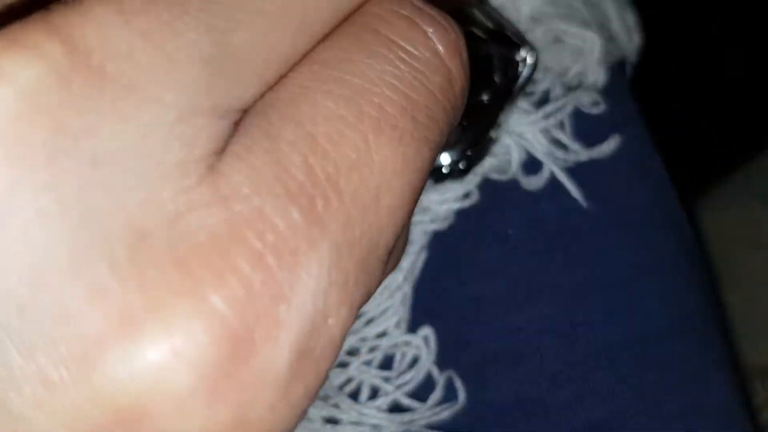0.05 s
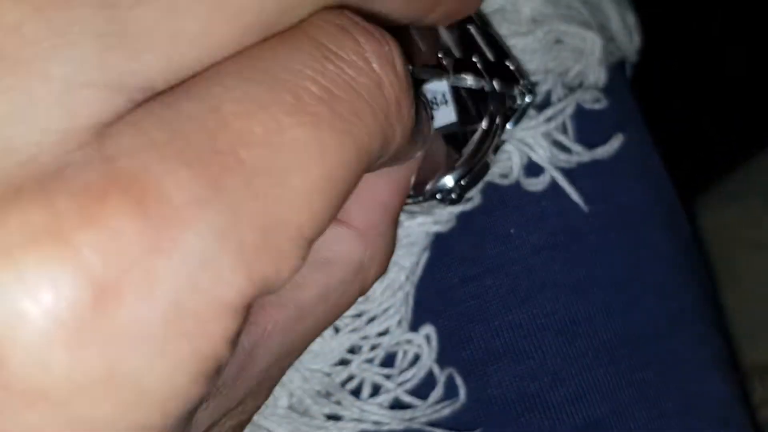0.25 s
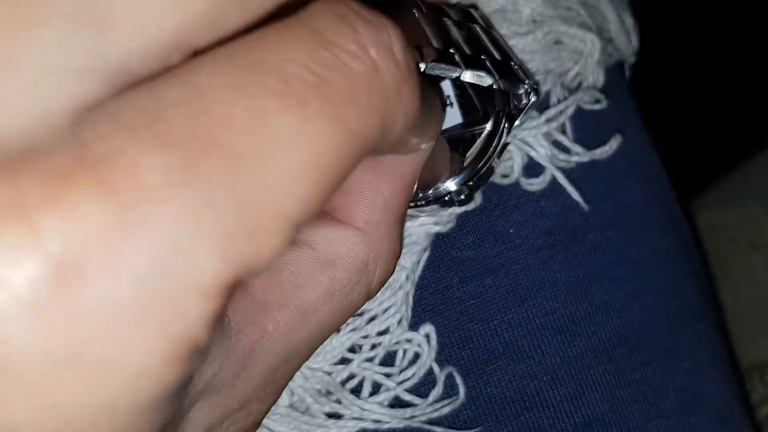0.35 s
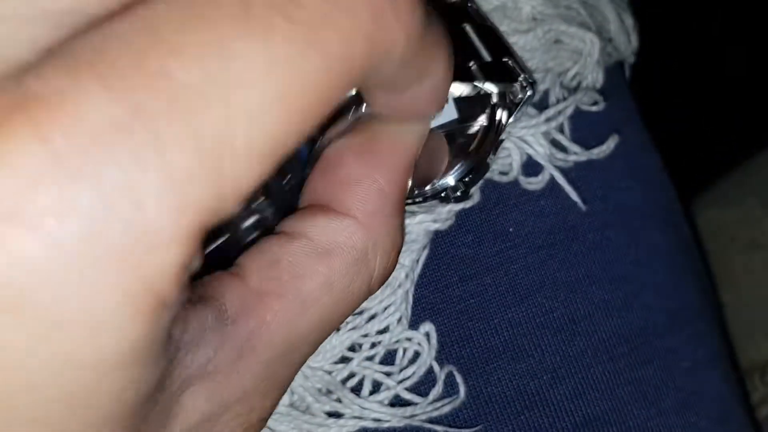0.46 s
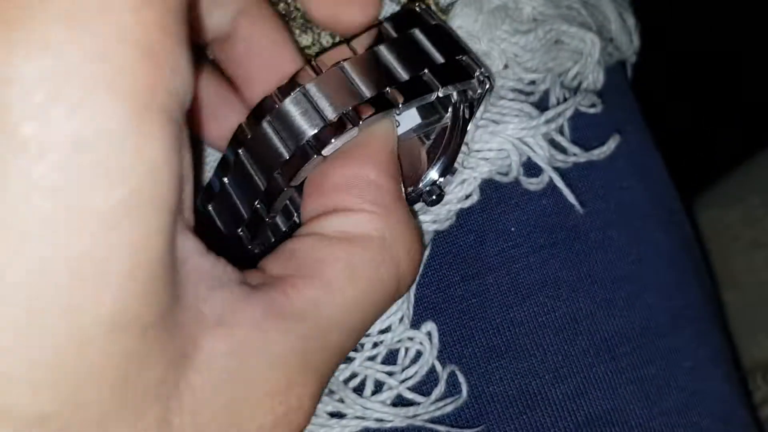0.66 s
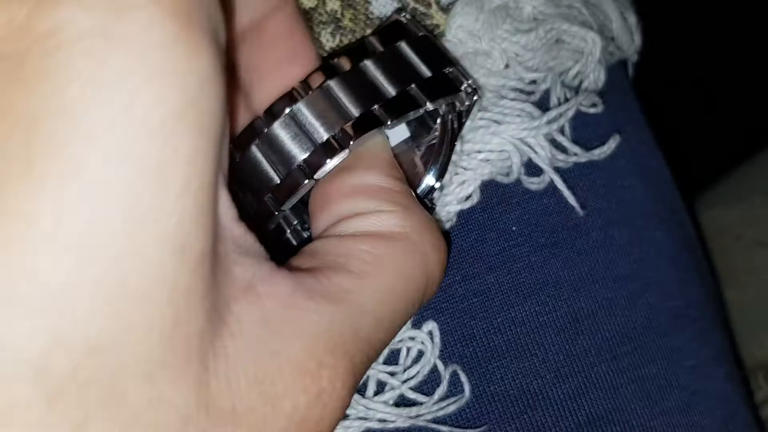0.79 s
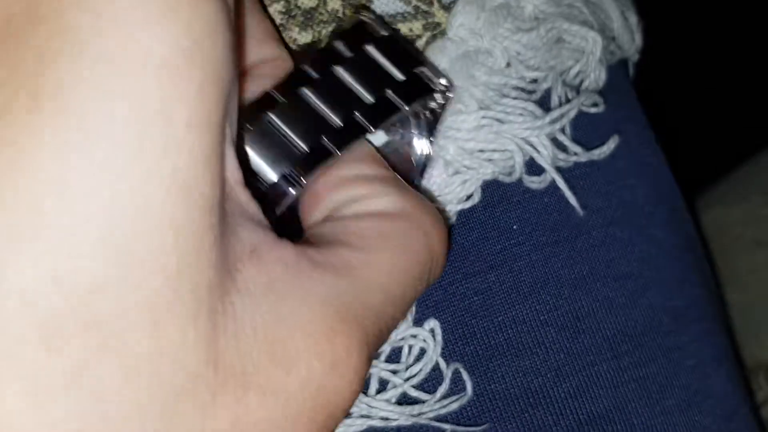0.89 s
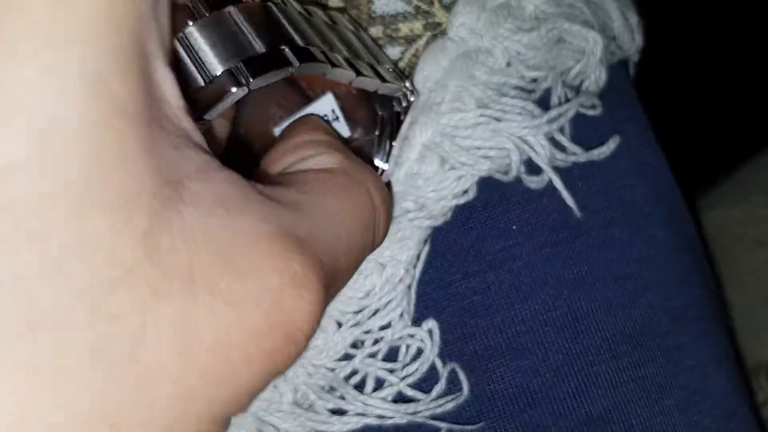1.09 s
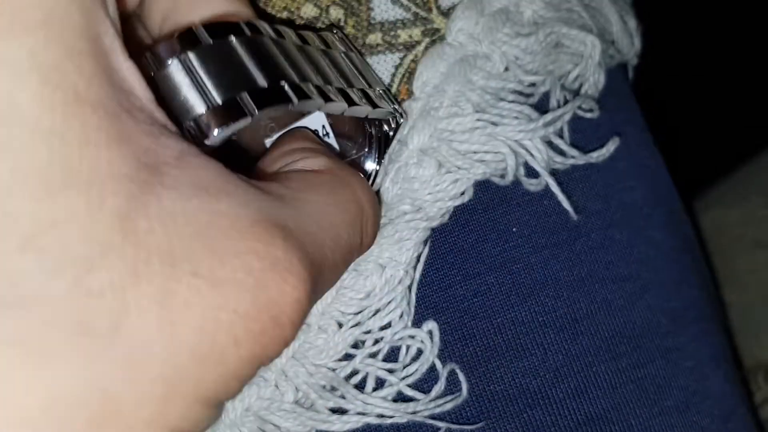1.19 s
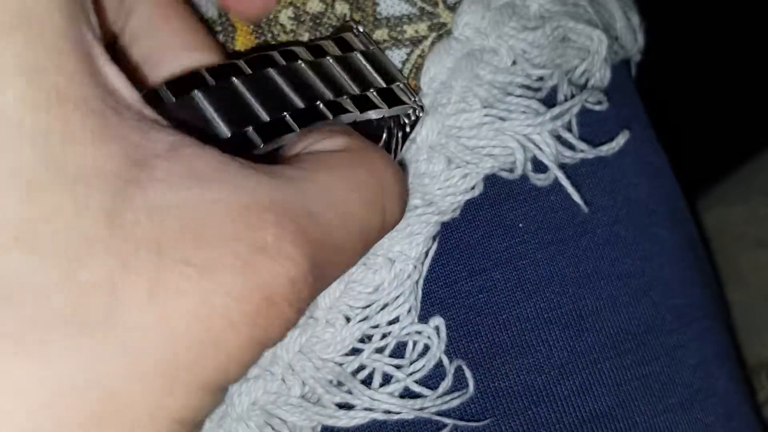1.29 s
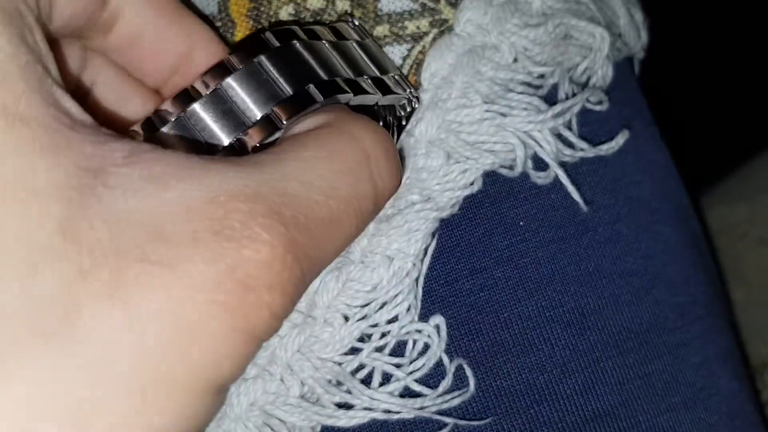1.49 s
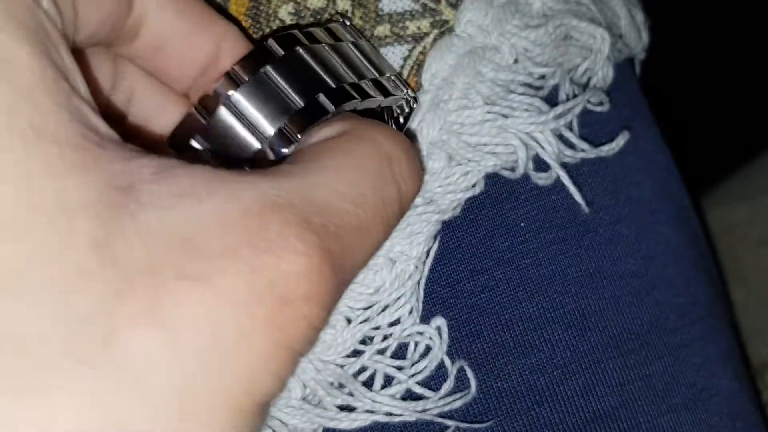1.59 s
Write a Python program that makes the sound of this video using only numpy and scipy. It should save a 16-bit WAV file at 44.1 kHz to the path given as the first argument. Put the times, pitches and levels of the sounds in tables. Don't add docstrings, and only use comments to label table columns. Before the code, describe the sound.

Steel watch links clink loudly once, then rattle lightly in scattered flurries with tiny ticks, thin pin squeaks and skin brushing metal; close and dry, over faint low room rumble and slight hiss.

```python
import sys
import numpy as np
from scipy import signal
from scipy.fft import rfft, irfft
from scipy.io import wavfile
from scipy.ndimage import uniform_filter1d

SR = 44100
rng = np.random.default_rng(int(sys.argv[2]) if len(sys.argv) > 2 else 0)


def pcm_store(signal):
    levels = np.round(np.clip(np.atleast_2d(signal), -1, 1) * 32767)
    wavfile.write(sys.argv[1], SR, levels.astype(np.int16).T)


def magnitude_from_level(level_db):
    exponent = np.asarray(level_db, float) / 20
    return 10 ** exponent


N = 72765
TIME = np.arange(N) / SR
BIN_HZ = np.maximum(np.arange(N // 2 + 1) * SR / N, 1)


def rms_one(x):
    return x / np.sqrt(np.mean(x ** 2) + 1e-20)


def at_hz(points, hz):
    table_hz, value = np.transpose(points)
    return np.interp(np.log(hz), np.log(table_hz), value)


def drift(rate_hz):
    r = np.exp(-2 * np.pi * rate_hz / SR)
    slow = signal.lfilter([1], [1, -2 * r, r * r], rng.standard_normal(N + SR))
    return rms_one(slow[SR:])


def ring(x, hz, t60):
    r, w = magnitude_from_level(-60 / (t60 * SR)), 2 * np.pi * hz / SR
    return signal.lfilter([0, np.sin(w)], [1, -2 * r * np.cos(w), r * r], x + 1e-18)


def colour(x, spectrum):
    return rms_one(irfft(rfft(x) * magnitude_from_level(at_hz(spectrum, BIN_HZ)), N))


def noise(spectrum):
    return colour(rng.standard_normal((2, N)), spectrum)


def gate(start, length):
    t = TIME - start
    return np.clip(np.minimum(t / .002, (length - t) / (.3 * length)), 0, 1), t


def top_cut(x):
    return signal.sosfilt(signal.cheby2(14, 45, 16150, fs=SR, output="sos"), x)


# frequency in Hz, level in dB.
ROOM_SPECTRUM = [(20, -39), (35, -11), (52, 5.5), (75, 3), (110, -9), (400, -20), (700, -27), (3000, -35)]
# frequency in Hz, left-right likeness from 0 to 1.
ROOM_LIKENESS = [(30, 0.89), (80, 0.77), (200, 0.23), (1000, 0.026), (8000, 0.047)]


def room_rumble():
    mid, side = rfft(rng.standard_normal((2, N)))
    alike = np.clip(at_hz(ROOM_LIKENESS, BIN_HZ), 0, 1)
    pair = irfft(np.sqrt(1 + alike) * mid + np.sqrt(1 - alike) * side * [[1], [-1]], N)
    return magnitude_from_level(-68 + 0.28 * drift(2.7)) * colour(pair, ROOM_SPECTRUM)


# frequency in Hz, level in dB per Hz.
HISS_SPECTRUM = [(2000, 2.5), (3500, -6), (6000, -16.5), (8300, -25), (14500, 4), (16500, -2.5)]


def microphone_hiss():
    return magnitude_from_level(-77) * noise(HISS_SPECTRUM)


# time in seconds, level in dB.
RUB_LEVEL = [(0, -100), (.19, -94), (.3, -77), (.39, -71), (.45, -72), (.62, -69), (.7, -79.5), (.86, -70),
             (1.22, -73.5), (1.4, -76.5), (1.45, -83), (1.6, -87)]
# frequency in Hz, level in dB per Hz.
RUB_SPECTRUM = [(1000, -19.5), (2300, -12), (3500, -12), (6800, -11.5), (8500, -15.5), (11000, -9.5),
                (15500, -7), (16500, -26)]


def finger_rub():
    level_db = np.interp(TIME, *np.transpose(RUB_LEVEL))
    return magnitude_from_level(level_db + 3.5 + 1.5 * drift(30)) * noise(RUB_SPECTRUM)


# start in seconds, length in seconds, level in dB, pitch in Hz.
PIN_SQUEAKS = [
    (.12, .05, -80, 6800),
    (.285, .066, -70, 6800),
    (.68, .035, -77, 6770),
    (.72, .045, -73, 6800),
    (.65, .14, -81, 2350),
    (1.09, .045, -79, 7000),
    (1.304, .075, -68, 6800),
    (1.1, .043, -70, 12100),
    (.585, .03, -76, 6800),
]


def squeaks():
    out = 0
    width_hz = 260
    t60 = np.log(1000) / np.pi / width_hz
    for start, length, db, hz in PIN_SQUEAKS:
        dots = magnitude_from_level(db + 4.5 * drift(45))
        tone = rms_one(ring(ring(rng.standard_normal((2, N)), hz, t60), hz, t60))
        out = out + gate(start, length)[0] * dots * tone
    return out


# start in seconds, peak in dB, pitch of the loudest link in Hz,
# brightness in dB, chatter in ms.
CLINKS = [(.2071, -11.5, 8530, 32, 2.1), (.4742, -26, 4700, 2, 2), (.4760, -29, 7300, 6, 0.87),
          (.4822, -31.5, 14100, 4, 0.9), (.4880, -31.5, 12500, -9, 2), (.4952, -28.5, 3230, -9, 1.1),
          (.8273, -31.5, 11900, 5, 0.75), (.8320, -31.5, 11350, -6, 1.1), (.8984, -32, 12300, -31, 0.56),
          (.9325, -35.5, 13400, -9, 1.2), (.9577, -36.5, 6800, -4, 1.5), (1.1423, -30, 4270, -13, 0.61),
          (1.1445, -29, 5360, -5.5, 5.1), (1.3367, -35, 11400, -16, 1.44)]
# start in seconds, peak in dB, pitch in Hz, chatter in ms.
TICKS = [(0.3537, -27, 12600, 0.25), (0.4327, -47, 11100, 0.85), (0.5083, -40.5, 15500, 0.82),
         (0.5157, -28.5, 11460, 0.48), (0.5842, -46.5, 6900, 6.1), (0.6192, -36.5, 8460, 0.36),
         (0.868, -42, 5400, 1.6), (0.927, -38, 12700, 0.65), (0.98, -39.5, 15400, 1),
         (0.9925, -44, 12600, 0.79), (1.043, -36.5, 15600, 0.64), (1.259, -42, 6700, 1.16),
         (1.2655, -50, 4560, 1.2), (1.3061, -41.5, 7040, 2), (1.3678, -43.5, 12300, 0.63),
         (1.4055, -50, 12800, .6), (1.6475, -43.5, 11000, 1.2), (1.324, -43, 11500, 2),
         (1.312, -45.5, 10900, 1.3), (1.378, -51, 12000, 1), (1.477, -66.5, 11000, .8),
         (0.95, -49, 12500, 0.91)]
# start in seconds, peak in dB, pitch in Hz, brightness in dB, chatter in ms.
DULL_KNOCKS = [(.1750, -35.5, 6270, -26, 0.48), (.1843, -35, 4150, -21.5, .2), (.8947, -26, 5330, -10, 1.3),
               (.917, -39, 5400, -15, 1.16), (1.0895, -54, 6740, -10, 1.2),
               (1.1295, -46.5, 6950, -20, 0.71), (1.3455, -45, 7400, -34, 1.1),
               (1.5155, -50.5, 3380, -7, 1.1), (1.6037, -47.5, 6000, 18, 1), (.4555, -46.5, 13200, 10, 3),
               (1.181, -47.5, 4300, -27, 2.2), (1.190, -49, 4350, -23, 1), (.2352, -47.5, 3030, -20.5, 1.1),
               (.833, -39, 3300, -16, 2.8)]
# frequency in Hz, level in dB.
LINK_MODES = [(3150, 3), (3800, -14.5), (4600, -26), (5700, -6.5), (6820, -3.5), (7300, 3.5), (8420, -0.5),
              (9200, 2), (10700, 7.5), (11900, 9), (13090, 8.5), (13890, 5), (15020, -0.5), (15600, -1.5)]


def clinks():
    out, t = np.zeros((2, N + SR)), np.arange(SR // 16) / SR
    crack_filter = signal.butter(2, 4500, "high", fs=SR, output="sos")
    tick_bright_db = -2.5
    ticks = [(s, db, hz, tick_bright_db, ms) for s, db, hz, ms in TICKS]
    for start, db, hz, bright_db, chatter_ms in list(CLINKS) + ticks + list(DULL_KNOCKS):
        shape = np.minimum(t / .0003, 1) * np.exp(-(t * 1000 / chatter_ms / 1.5) ** 1.5)
        contacts = shape * rng.choice([-1, 1], len(t)) * rng.exponential(1, len(t))

        steel = magnitude_from_level(17) * signal.sosfilt(crack_filter, contacts)
        for mode_hz, mode_db in LINK_MODES:
            luck_db = rng.normal(0, 2.5, 3)
            t60 = .0075 * (7000 / mode_hz) ** 0.48
            steel = steel + magnitude_from_level(mode_db + luck_db[0] + luck_db[1:, None]) * ring(contacts, mode_hz, t60)

        loudest_link = magnitude_from_level(10) * ring(contacts, min(hz, 16000), .0045)
        x = magnitude_from_level(bright_db) * steel + loudest_link
        x = x + .35 * np.array([np.roll(x[0], 31), -np.roll(x[1], 47)])
        peak = np.sqrt(uniform_filter1d(x ** 2, size=44).max())
        i = int(start * SR)
        out[:, i:i + len(t)] += magnitude_from_level(db) * x / peak / 2
    return signal.sosfilt(signal.butter(8, 2950, "high", fs=SR, output="sos"), out[:, :N])


RING_STARTS = [.1752, .1845, .2073, .2082, .3533, .4749, .4761, .8278, .8951, .9580, 1.0432, 1.0897, 1.1432,
               1.1447, 1.1462, 1.3369, 1.5157, 1.5245, 1.6039]
# frequency in Hz, level in dB, t60 in ms.
RINGING_LINKS = [
    [(5700, -43.5, 6.8)],
    [(2250, -47.5, 6), (7320, -60, 5)],
    [(2620, -27.5, 7.8), (3070, -23.5, 7.7), (4750, -25.5, 8.5), (5740, -31, 18), (6400, -21.5, 3.5),
     (6800, -20.5, 18.7), (15450, -18, 6)],
    [(9280, -17.5, 8.8), (11965, -11.5, 12)],
    [(3065, -43, 12.5), (4510, -38.5, 4.2), (6600, -57, 5.1), (8970, -29, 5.5), (13090, -23.5, 4.7)],
    [(2190, -40, 12), (3040, -34.5, 11), (5600, -43, 5.8), (15500, -25, 6)],
    [(6810, -27.5, 17), (15050, -23, 7)],
    [(7060, -35, 16)],
    [(3270, -40.5, 29), (3770, -29.5, 7.2), (810, -55.5, 26), (4740, -29, 18), (5695, -18.5, 9.1),
     (6830, -24, 13), (9920, -37, 5.9), (11200, -29, 4.7), (13700, -35, 8.4)],
    [(4660, -44, 6), (11000, -42, 7.4)],
    [(12000, -40, 7)],
    [(6600, -50.5, 15)],
    [(4030, -34.5, 12)],
    [(10400, -32.5, 9), (14900, -25.5, 8.6)],
    [(12340, -26, 8.4)],
    [(3330, -56.5, 13), (6840, -41, 26), (11750, -29, 10)],
    [(7460, -53.5, 9.3)],
    [(3300, -54.5, 9.9), (7300, -55, 4.4)],
    [(2300, -55.5, 11), (5120, -38.5, 10), (6410, -39, 10.3), (12210, -38.5, 8.9)],
]


def link_rings():
    out, t = np.zeros((2, N + SR)), np.arange(SR // 20) / SR
    for start, links in zip(RING_STARTS, RINGING_LINKS):
        i = int(start * SR)
        for hz, db, t60_ms in links:
            phase = rng.uniform(0, 2 * np.pi, (2, 1))
            shape = np.minimum(t / .0004, 1) * magnitude_from_level(db - 60e3 * t / t60_ms)
            out[:, i:i + len(t)] += shape * np.sin(2 * np.pi * hz * t + phase)
    return out[:, :N]


# start in seconds, length in seconds, fade in dB per second.
SLIDE_RUNS = [(.211, .14, 170), (.476, .046, 120), (.52, .06, 200), (.835, .04, 30), (.888, .008, 0),
              (.9, .12, 20), (1.13, .014, 0), (1.148, .065, 170), (1.25, .03, 30), (1.30, .085, 30),
              (1.605, .06, 30), (.2015, .007, 0)]
# bright grit in dB, dull rub in dB.
SLIDE_LEVELS = [(-48.5, -57), (-41.5, -56), (-59, -69), (-70, -65), (-51.5, -66), (-56, -65.5), (-56, -69),
                (-52, -78.5), (-66.5, -100), (-69, -86), (-70, -78.5), (-46.5, -66)]
# frequency in Hz, level in dB per Hz.
GRIT_SPECTRUM = [(1800, -38.5), (2700, -4), (3300, 1), (5000, -3.5), (6800, 2.5), (9000, -7.5),
                 (12000, 2.5), (15500, -4.5)]
# frequency in Hz, level in dB per Hz.
DULL_SPECTRUM = [(500, -12.5), (1000, -14), (1500, -4), (2500, -5), (3500, -18)]


def slides():
    grains_per_s, spread_db = 11000, 3.0
    grains = rng.random((3, N)) < grains_per_s / SR
    size_db = spread_db * np.minimum(rng.exponential(1, (3, N)), 4)
    grit = grains * magnitude_from_level(size_db) * rng.choice([-1, 1], (3, N))
    grit = grit[0] + .9 * grit[1:]

    runs = []
    for start, length, fade in SLIDE_RUNS:
        window, t = gate(start, length)
        runs.append(window * magnitude_from_level(-fade * np.maximum(t, 0)))
    bright, dull = magnitude_from_level(np.transpose(SLIDE_LEVELS)) @ runs
    throb = magnitude_from_level(2.2 * drift(60))
    return throb * (bright * colour(grit, GRIT_SPECTRUM) + dull * colour(grit, DULL_SPECTRUM))


def palm_thud():
    knock = np.zeros(N)
    knock[int(.2075 * SR)] = 1
    return magnitude_from_level(-42) * ring(knock, 340, 0.012)


# start in seconds, level in dB.
CASE_HITS = [
    (0.2085, -27.5),
    (0.4733, -50),
    (0.8273, -42),
    (0.8945, -32),
    (1.602, -61),
    (1.645, -49.5),
]
# frequency in Hz, level in dB, t60 in seconds.
CASE_MODES = [(778, -17, 0.012), (1500, -12, 0.032), (1756, -13.5, 0.029), (2160, -18, 0.045)]


def watch_case():
    push, t = np.zeros((2, N)), np.arange(200) / SR
    for start, db in CASE_HITS:
        i = int(start * SR)
        push[:, i:i + 200] += magnitude_from_level(db - 11.5) * rng.standard_normal((2, 200)) * np.exp(-t / 0.00026)
    return sum(magnitude_from_level(db) * ring(push, hz, t60) for hz, db, t60 in CASE_MODES)


def finger_bump():
    bump = np.zeros(N)
    bump[int(.8676 * SR)] = 1
    r = np.exp(-2 * np.pi * 465 / SR)
    snap = magnitude_from_level(-38.5) * signal.lfilter([.4], np.convolve([1, -r], [1, -.6]), bump)
    wobble = magnitude_from_level(-45.5) * ring(bump, 77.4, 0.048)
    port_db = np.array([[3.], [-5.]])
    return (snap - wobble) * magnitude_from_level(port_db)


# frequency in Hz, left over right in dB.
PORT_COLOUR = [(2000, -1.5), (3500, -3.5), (6000, 2), (9000, 7), (10700, 6), (12500, -7.5), (16000, 0)]
# time in seconds, left over right in dB.
BRACELET_SWING = [(0, 1.5), (.4, 0.5), (.7, 0.5), (.9, -1), (1.14, 3.5), (1.34, 0), (1.65, 2.5)]


def ports(x):
    pan_db = at_hz(PORT_COLOUR, BIN_HZ)
    swing_db = np.interp(TIME, *np.transpose(BRACELET_SWING))
    half = np.array([[.5], [-.5]])
    return magnitude_from_level(half * swing_db) * irfft(rfft(x) * magnitude_from_level(half * pan_db), N)


def add_echo(x):
    t = np.arange(SR // 4) / SR
    echo = rng.standard_normal((2, len(t))) * magnitude_from_level(-60 * t / .13) * (t > .003)
    return x + magnitude_from_level(-54) * signal.fftconvolve(x, echo, axes=1)[:, :N]


def scene():
    steel = ports(clinks() + watch_case() + top_cut(slides()) + squeaks() + link_rings())
    steel[0] = np.roll(steel[0], int(-.0005 * SR))
    steel = add_echo(steel)
    steady = top_cut(finger_rub() + microphone_hiss() + room_rumble())
    return steel + steady + palm_thud() + finger_bump()


def low_pass(x):
    return signal.sosfilt(signal.butter(12, 17040, fs=SR, output="sos"), x)


def record(dry):
    mix = signal.sosfilt(signal.cheby2(10, 40, 16800, fs=SR, output="sos"), dry)
    return low_pass(mix)


dry = scene()
out = record(dry)
pcm_store(out)
```